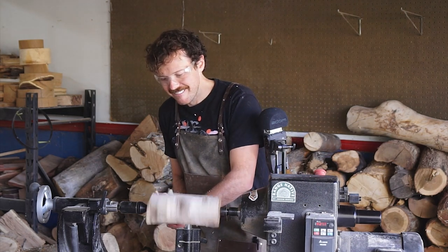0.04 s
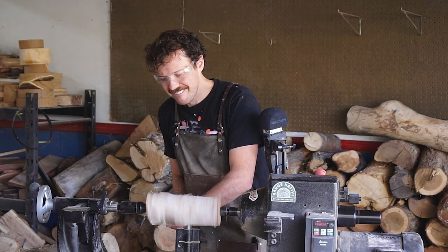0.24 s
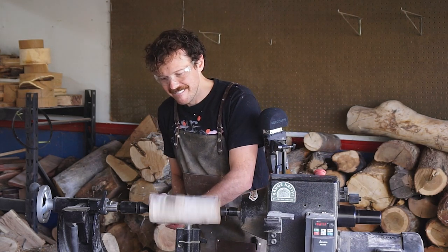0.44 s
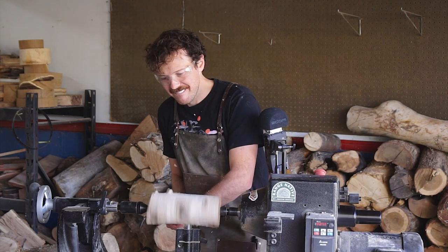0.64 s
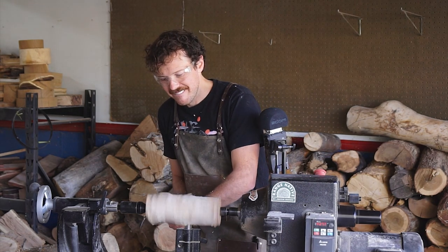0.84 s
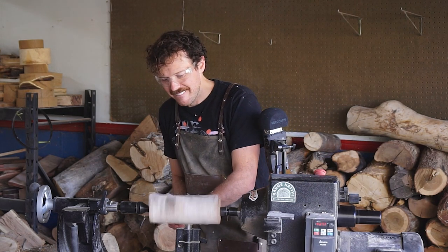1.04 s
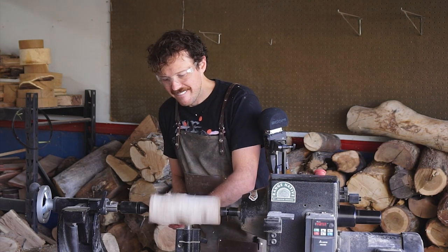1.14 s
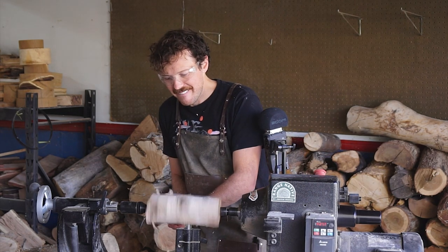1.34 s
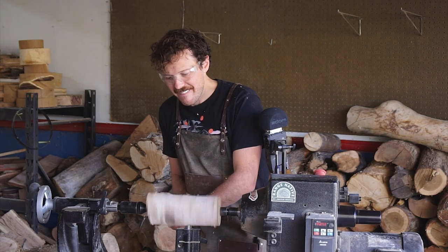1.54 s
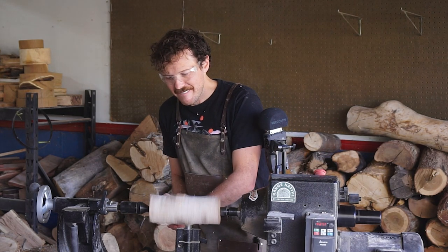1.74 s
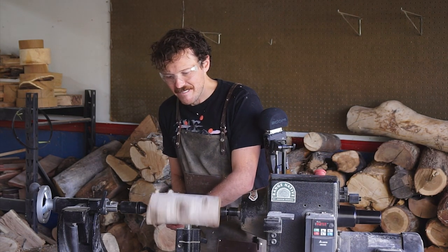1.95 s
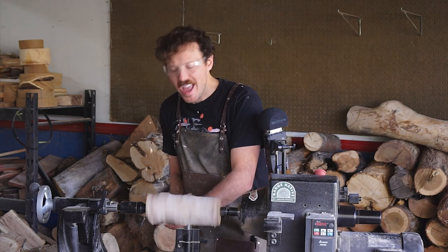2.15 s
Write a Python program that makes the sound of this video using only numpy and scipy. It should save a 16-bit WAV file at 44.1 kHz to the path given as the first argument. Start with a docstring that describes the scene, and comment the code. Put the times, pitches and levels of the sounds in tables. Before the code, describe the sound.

A gouge bites into a rough log spinning on a lathe, making a rapid, rasping clatter. It pauses briefly while the log swishes round, then returns twice as fast. The lathe rumbles underneath in a small workshop.

```python
"""A roughing gouge bites into an out-of-round log on a lathe, first once a turn, then twice a turn.
Each bite is a brief noisy force: fibres tear and rasp, the steel gouge rings in its natural modes,
the log knocks and the lathe bed thumps; thrown chips flick against the tool rest.
Between the two passes the free log swishes round. Beneath it all the lathe rushes and rumbles and
its motor drive whines. A small workshop adds reverberation to the cutting."""
import sys
import numpy as np
from scipy import signal
from scipy.fft import rfft, irfft, next_fast_len
from scipy.io import wavfile
from scipy.ndimage import uniform_filter1d, map_coordinates

SR = 44100
rng = np.random.default_rng(int(sys.argv[2]) if len(sys.argv) > 2 else 0)


def generate_wav(signal):
    """Clip the signal to [-1, 1] and save it as 16-bit WAV at the path in sys.argv[1]."""
    frames = np.transpose(np.atleast_2d(signal))
    scaled = np.clip(frames, -1, 1) * 32767
    pcm = np.round(scaled).astype(np.int16)
    wavfile.write(sys.argv[1], SR, pcm)


N = 97372

# Bites of the gouge. Each row: start, rise time and time to release in seconds, then the relative
# levels of tearing, scraping, knocking and thumping in dB.
BITES = [(0, 0.004, 0.019, -30, -31.5, -37.5, -30.5), (0.055, 0.011, 0.016, -17.5, -23.5, -30.5, -23.5),
         (0.141, .001, 0.02, -19.5, -25, -27.5, -23.5), (0.228, 0.00074, .019, -20.5, -27.5, -30, -27),
         (0.311, 0.0029, 0.017, -20, -24.5, -30, -24), (.399, .003, 0.017, -24, -25.5, -30.5, -26.5),
         (0.484, 0.0065, 0.016, -21, -30, -30.5, -24), (.576, 0.0023, 0.0062, -30, -25, -28.5, -25),
         (1.135, 0.0025, 0.006, -34, -38, -42.5, -47), (1.179, .002, 0.0091, -32.5, -41.5, -40, -50),
         (1.218, 0.0045, 0.0088, -21, -22, -20.5, -29), (1.265, 0.0036, 0.013, -27, -30.5, -34.5, -36.5),
         (1.304, 0.0022, 0.015, -24, -28, -29, -31), (1.352, 0.0014, 0.0086, -23.5, -30.5, -37, -32),
         (1.390, 0.0054, 0.017, -32.5, -28.5, -29.5, -29.5),
         (1.440, 0.0026, .010, -32.5, -38, -28.5, -28.5),
         (1.481, 0.0032, 0.013, -28.5, -39.5, -32.5, -30.5),
         (1.523, 0.0039, 0.012, -24.5, -22.5, -23.5, -30.5), (1.563, 0.0013, 0.013, -27, -35.5, -32, -32.5),
         (1.611, 0.0027, .013, -21.5, -23.5, -29, -27.5), (1.652, .003, 0.015, -26, -30.5, -30, -27.5),
         (1.698, 0.0027, .014, -19, -22, -31.5, -30.5), (1.738, .003, 0.0086, -21, -26, -24.5, -25),
         (1.786, 0.0049, 0.012, -25.5, -27.5, -28, -31.5), (1.824, 0.0042, 0.01, -21, -23.5, -24.5, -27.5),
         (1.873, .004, 0.015, -23, -23, -28, -33.5), (1.91, 0.0096, 0.013, -12.5, -17.5, -14, -21.5),
         (1.958, 0.0048, 0.021, -22.5, -26, -21, -24), (1.998, 0.0076, 0.011, -13, -20, -36, -29.5),
         (2.044, 0.01, .019, -16.5, -20.5, -32, -22), (2.140, 0.00067, 0.0066, -16.5, -21, -31.5, -22.5)]
# Natural modes and resonances. Each row: frequency in Hz, bandwidth in Hz, relative level in dB.
GOUGE_MODES = [(2014, 49, 3), (2405, 40, 4), (3734, 70, 1), (4753, 220, -3), (6110, 186, -7),
               (7063, 118, 1), (7180, 130, -5.5), (7660, 87, -7), (9570, 150, -7)]
LOG_MODES = [(664, 38, 2), (744, 46, 3.5), (875, 53, -7), (1068, 58, -2), (1271, 27, -2.5)]
LOW_RESONANCES = [(144.5, 11.5, -4), (180.6, 15.8, -2), (240, 8.3, 2.5), (279.8, 7.5, -2), (323.5, 10.4, -0.5),
                  (388.7, 18.7, -1), (461, 17.7, -1.5), (560.2, 22.6, -6)]
# Broadband spectra. Each row: frequency in Hz, relative spectral density in dB.
TEAR_SPECTRUM = [(1500, -26.5), (3500, -17.5), (5000, -1.5), (7500, 4.5), (10000, -0.5), (12500, 2),
                 (14500, -11), (16000, -12.5)]
SCRAPE_SPECTRUM = [(300, -10.5), (700, -7), (1100, -2.5), (1600, -3), (2400, 2), (3600, 1.5), (4200, -7),
                   (9000, -12)]
KNOCK_SPECTRUM = [(200, -21), (450, -5.5), (700, 3.5), (1100, -4), (1400, -2), (2000, -18.5), (5000, -48.5)]
THUMP_SPECTRUM = [(60, -19), (115, -30), (150, -2), (200, -1.5), (260, -1), (450, -1), (700, -3),
                  (1100, -13), (2000, -14.5), (5000, -35)]
CHIP_SPECTRUM = [(2000, -21), (5500, -11), (8000, -2), (9500, -12), (12000, -12), (16000, -22)]
SWISH_SPECTRUM = [(1000, -14), (3000, -5.5), (5000, -6), (6500, 5.5), (9000, -2.5), (15000, -27)]
RUSH_SPECTRUM = [(15, -5), (25, -6.5), (416, -21.5), (503, -17.5), (911, -27.5), (988, -20), (1290, -25),
                 (3620, -30.5), (3920, -35), (5880, -33), (7920, -27), (8590, -35), (16000, -40)]
RUMBLE_SPECTRUM = [(20, 3), (30, -0.5), (48, -4), (70, -4.5), (110, -6.5), (250, -44.5)]
# Swishes of the free log. Each entry: relative level in dB on one successive turn.
SWISH_LEVELS = [-44, -51.5, -50.5, -82, -44]
# Tones of the motor drive. Each row: frequency in Hz, width in Hz, relative level in dB.
DRIVE_TONES = [(3916, 53, -67.5), (7752, 60, -70), (7946, 10, -61.5), (8000, 9.6, -65), (8100, 14, -62),
               (12000, 160, -69)]
# Rumble as the load varies. Each row: time in seconds, relative level in dB.
RUMBLE_LEVELS = [(0.0, -53), (0.31, -49.5), (1.05, -67), (1.45, -43), (1.46, -47), (2.11, -43.5),
                 (2.2, -52)]
# Level difference between the ears. Each row: frequency in Hz, left minus right in dB.
EAR_LEVEL_DIFFERENCE = [(60, 7), (180, 1), (350, -1.5), (700, -2), (1300, -3), (2400, -6), (4400, -4.5),
                        (8000, -4), (15000, -5.5)]
# Phase difference between the ears. Each row: frequency in Hz, lead of the left ear in radians.
EAR_PHASE_LEAD = [(100, 0), (600, 0.43), (1300, 0.64), (2400, 1.0), (3700, .9), (4500, 1), (8000, 0),
                  (15000, 0.043)]
# Reverberation of the workshop. Each row: frequency in Hz, time to decay by 60 dB in seconds.
ROOM_T60 = [(100, 0.75), (260, 0.37), (700, 0.47), (1840, 0.37), (5000, 0.37), (9000, 0.23), (15000, 0.12)]
# Likeness of the reverberation at the two ears. Each row: frequency in Hz, correlation.
ROOM_CORRELATION = [(100, 0.57), (400, 0.48), (1000, 0.98), (3000, 0.6), (10000, 0.15)]

SAG_DB_PER_S, RELEASE_S = 208, 0.0026  # the cut weakens as it runs; the gouge leaves the wood
FIBRE_HZ, FIBRE_DB = 1195, 2.5  # rate and depth of the fibres' snapping
CHIP_DB, CHIP_MAX_FLIGHT_S, CHIP_FADE_S = -12, 0.0586, 0.0029
TURN_S = 0.087
SWISH_START_S, SWISH_RISE_S, SWISH_FADE_S = 0.652, 0.0024, 0.039
BAND_LIMIT_HZ = 15850


def cutting():
    """Source and filter: each bite drives broad spectra, natural modes of wood and steel, and low resonances."""
    tear, scrape, knock, thump = bite_envelopes()
    fibres = filtered(tear * grain(correlation=0.31, patchy_db=4), amp(-3.5) * colour(TEAR_SPECTRUM))
    edge_force = np.sqrt(tear * scrape) * grain(correlation=0.24, patchy_db=3)
    steel = filtered(edge_force, amp(-3) * resonances(GOUGE_MODES))
    rasp = filtered(scrape * grain(correlation=0.34, patchy_db=2), amp(-3) * colour(SCRAPE_SPECTRUM))
    log = filtered(knock * noise(correlation=0.42), amp(-7.5) * colour(KNOCK_SPECTRUM))
    log += filtered(knock * noise(correlation=0.46), amp(-7) * resonances(LOG_MODES))
    bed = filtered(thump * noise(correlation=0.49), amp(-3) * colour(THUMP_SPECTRUM))
    bed += filtered(thump * noise(correlation=0.4), amp(-2.5) * resonances(LOW_RESONANCES))
    treble = workshop(fibres + steel + chips(), wet_db=-12, build_s=0.0027)
    middle = workshop(rasp + log, wet_db=-2, build_s=0.003)
    bass = workshop(bed, wet_db=-3, build_s=0.01)
    return at_ears(treble + middle + bass)


def bite_envelopes():
    """Intermittent contact: each bite's force rises, sags and lets go, roughened by snapping fibres."""
    t, force = np.arange(N) / SR, np.zeros((4, N))
    for start, rise, length, *levels in BITES:
        age = np.maximum(t - start, 0)
        attack = np.minimum(age / rise, 1)
        sag = amp(-SAG_DB_PER_S * np.maximum(age - rise, 0))
        release = np.exp(-np.maximum(age - length, 0) / RELEASE_S)
        force += amp(levels)[:, None] * (attack * sag * release)
    snapping = unit(amp(FIBRE_DB * wobble(FIBRE_HZ)))
    return force * snapping


def grain(correlation, patchy_db):
    """Spectral modulation: the grain of the wood changes the noise's colour from bite to bite."""
    spectra = signal.stft(noise(correlation), nperseg=512)[2]
    patches = rng.standard_normal(spectra.shape[1:])
    patches = uniform_filter1d(patches, size=5, axis=0)  # across frequency
    patches = uniform_filter1d(patches, size=7, axis=1)  # across time
    patchy = signal.istft(spectra * amp(patchy_db * unit(patches)), nperseg=512)[1]
    return unit(patchy[:, :N])


def chips(per_bite=3):
    """Light impacts: chips flick against the tool rest after a random time of flight."""
    t, flicks = np.arange(N) / SR, np.zeros(N)
    for start, _, length, tear_db, *_ in BITES:
        for flight, size in rng.random((per_bite, 2)):
            age = np.maximum(t - start - length - flight * CHIP_MAX_FLIGHT_S, 0)
            pulse = age / CHIP_FADE_S * np.exp(-age / CHIP_FADE_S)
            flicks += amp(tear_db + CHIP_DB) * 2 * size * pulse
    return filtered(flicks * grain(correlation=0.4, patchy_db=4), colour(CHIP_SPECTRUM))


def swish():
    """Amplitude modulation by rotation: the free-running log brushes past once a turn."""
    t, envelope = np.arange(N) / SR, np.zeros(N)
    for turn, db in enumerate(SWISH_LEVELS):
        age = np.maximum(t - SWISH_START_S - turn * TURN_S, 0)
        envelope += amp(db) * (1 - np.exp(-age / SWISH_RISE_S)) * np.exp(-age / SWISH_FADE_S)
    return envelope * filtered(noise(correlation=0.27), amp(-0.5) * colour(SWISH_SPECTRUM))


def running_lathe():
    """Machine noise: a broadband rush, a narrowband drive whine and a rumble that grows under load."""
    rush = amp(-54) * filtered(noise(correlation=0.3), colour(RUSH_SPECTRUM))
    whine = np.zeros((2, N))
    for hz, width, db in DRIVE_TONES:
        band = 1 / (1 + (2 * (frequencies() - hz) / width) ** 2)
        whine += amp(db + 1.5) * unit(filtered(noise(correlation=0.25), band))
    whine *= amp([[2], [-2]])  # left of centre
    load = amp(np.interp(np.arange(N) / SR, *np.transpose(RUMBLE_LEVELS)) + 8)
    low_band = colour(RUMBLE_SPECTRUM) * (frequencies() < 300)
    rumble = load * unit(filtered(noise(correlation=-0.6), low_band))
    return rush + whine + rumble


def workshop(x, wet_db, build_s):
    """Diffuse reverberation: each stretch of sound is convolved with its own decaying noise tail."""
    wet = np.zeros((2, N + SR))
    for part in np.array_split(np.arange(N), 16):
        hz, t, spectra = signal.stft(rng.standard_normal((2, SR // 2)), SR, nperseg=256)
        spectra = correlated(spectra, along(ROOM_CORRELATION, hz)[:, None])
        decay = amp(-60 * t / along(ROOM_T60, hz)[:, None])
        tail = signal.istft(spectra * decay, SR, nperseg=256)[1]
        tail *= 1 - np.exp(-np.arange(tail.shape[1]) / SR / build_s)
        reverb = signal.fftconvolve(x[:, part], tail / np.linalg.norm(tail[0]), axes=1)
        wet[:, part[0]:part[0] + reverb.shape[1]] += reverb
    return x + amp(wet_db) * wet[:, :N]


def at_ears(x):
    """Interaural differences: all but the bass is louder on the right; the left leads in phase."""
    side = np.array([[0.5], [-0.5]])
    gain = amp(side * along(EAR_LEVEL_DIFFERENCE, frequencies()))
    phase = side * along(EAR_PHASE_LEAD, frequencies())
    return filtered(x, gain * np.exp(1j * phase))


def resonances(modes):
    """Modal superposition: damped resonators of alternating sign, scaled to unit power."""
    f = frequencies()
    response = sum((-1) ** k * amp(db) * 1j * f * width / (hz * hz - f * f + 1j * f * width)
                   for k, (hz, width, db) in enumerate(modes))
    return response / np.sqrt(np.mean(abs(response) ** 2))


def colour(spectrum):
    """Minimum phase: folding the cepstrum gives a causal, unit-power response with this spectrum."""
    cepstrum = irfft(np.log(amp(along(spectrum, frequencies()))))
    half = len(cepstrum) // 2
    cepstrum[1:half] *= 2
    cepstrum[half + 1:] = 0
    response = np.exp(rfft(cepstrum))
    return response / np.sqrt(np.mean(abs(response) ** 2 * (frequencies() < BAND_LIMIT_HZ)))


def noise(correlation):
    """Partial coherence: two channels of white noise, partly the same."""
    return correlated(rng.standard_normal((2, N)), correlation)


def correlated(pair, correlation):
    """Sum and difference mixing gives two independent noises the stated correlation."""
    angle = np.arccos(np.clip(correlation, -1, 1)) / 2
    mid, side = np.cos(angle) * pair[0], np.sin(angle) * pair[1]
    return np.array([mid + side, mid - side])


def wobble(hz):
    """Spline interpolation: a smooth curve through hz random values a second."""
    return map_coordinates(rng.standard_normal(N), [np.arange(N) * hz / SR], mode="wrap")


def filtered(x, response):
    """Linear filtering: the spectrum of x is multiplied by a frequency response."""
    size = 2 * next_fast_len(N)
    return irfft(rfft(x, size) * response, size)[..., :N]


def frequencies():
    """The Fourier frequencies in Hz on which responses are given."""
    return np.fft.rfftfreq(2 * next_fast_len(N), 1 / SR)


def along(points, hz):
    """Interpolation of (Hz, value) points on a logarithmic frequency axis."""
    point_hz, values = np.transpose(points)
    return np.interp(np.log(hz + 1), np.log(point_hz + 1), values)


def amp(db):
    """Decibels to amplitude ratio."""
    return 10 ** (np.asarray(db) / 20)


def unit(x):
    """Normalisation to an rms of 1."""
    return x / np.sqrt(np.mean(x ** 2) + 1e-20)


def scene():
    """Superposition: the cuts and the swishing log add to the running lathe."""
    return cutting() + swish() + running_lathe()


def record(dry):
    """Soft saturation rounds off the highest peaks; a steep low-pass limits the band."""
    rounded = dry / (1 + abs(dry / 0.92) ** 6) ** (1 / 6)
    return filtered(rounded, 1 / np.sqrt(1 + (frequencies() / BAND_LIMIT_HZ) ** 200))


dry = scene()
out = record(dry)
generate_wav(out)
```